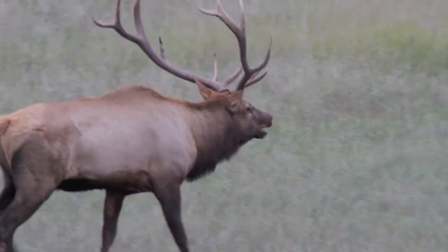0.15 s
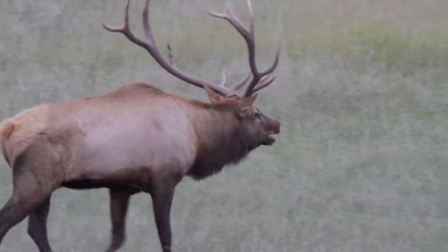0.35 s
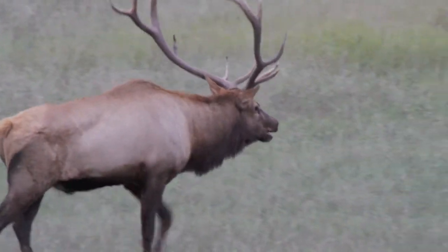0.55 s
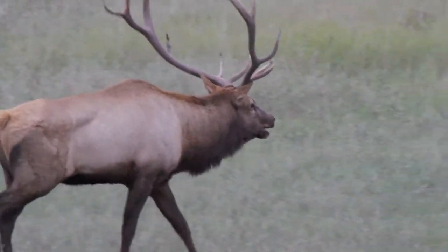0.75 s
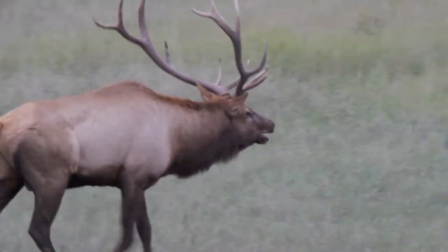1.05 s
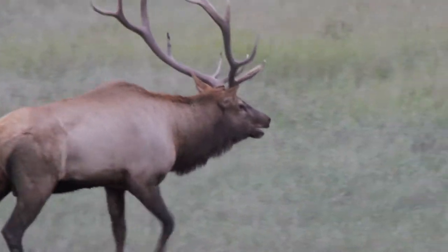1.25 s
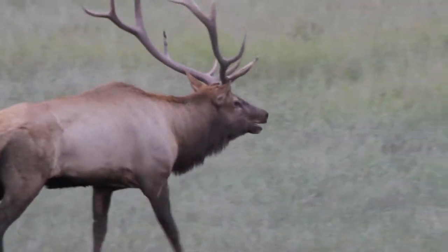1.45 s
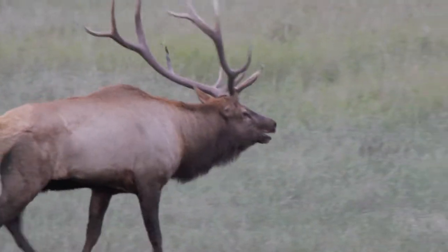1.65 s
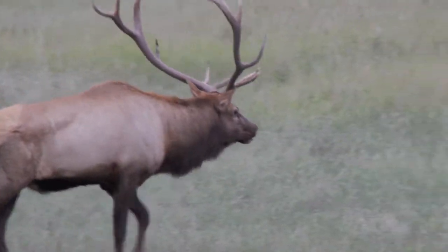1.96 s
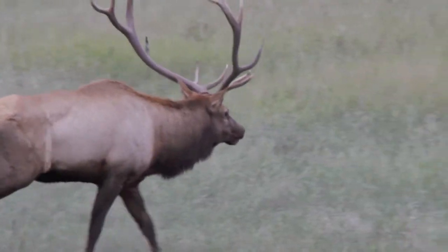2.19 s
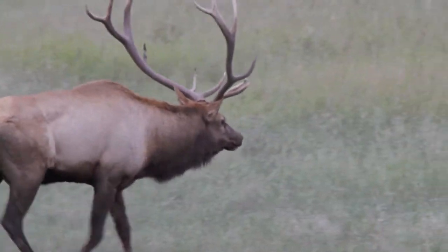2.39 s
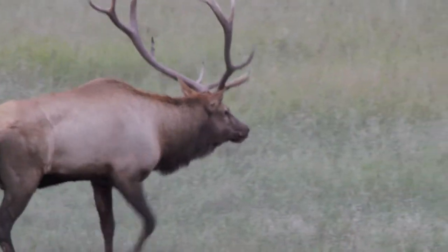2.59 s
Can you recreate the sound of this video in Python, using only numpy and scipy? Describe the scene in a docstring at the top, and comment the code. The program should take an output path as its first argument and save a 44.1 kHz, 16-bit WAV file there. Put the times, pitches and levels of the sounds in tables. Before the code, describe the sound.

Elk bugle: hoarse, breaking whistle falling to a short moan, then echo, wind and faint chirps

```python
"""A bull elk bugles in an open meadow: a high whistle jumps between registers over a hoarse roar that
all but stops after a second; the whistle then breaks, drops and ends in a short moan. The whistle is
a trembling harmonic tone; the roar is fold pulses and noisy puffs filtered by throat resonances.
Distant trees echo the call. Behind it lie faint gliding chirps and ticks of small birds or insects,
a soft bump, and shaped noise for wind rumble and steady hiss."""
import sys
import numpy as np
from scipy import signal
from scipy.fft import rfft, irfft
from scipy.io import wavfile

SR = 44100
rng = np.random.default_rng(int(sys.argv[2]) if len(sys.argv) > 2 else 0)


def waveform_to_disk(signal):
    """Save audio, clipped to [-1, 1], as 16-bit WAV at the path in sys.argv[1]."""
    frames = np.transpose(np.atleast_2d(signal))
    scaled = np.clip(frames, -1, 1) * 32767
    samples = np.round(scaled).astype(np.int16)
    wavfile.write(sys.argv[1], SR, samples)


N = 120393
T = np.arange(N) / SR  # time of each sample, s

# Vocal folds and roar. Each row: time in seconds, fold pitch in Hz, roar level in dB,
# factor on the throat's resonance frequencies.
FOLDS_AND_ROAR = [(0, 170, -37.5, 1.022), (.17, 162, -33.5, 1.05), (.27, 161.7, -33, 1.05),
                  (.43, 146.7, -31.5, 1.04), (.49, 134.8, -28.5, .94), (.54, 131.2, -29.5, 1.004),
                  (.68, 151.5, -32, 1.01), (.83, 139, -34, 0.97), (.93, 145.2, -35, 0.98),
                  (1.032, 149, -31.5, 1.04), (1.056, 145.8, -61, 0.93), (1.73, 141.1, -45, 1.05),
                  (1.79, 128.7, -42.5, 1.08), (1.85, 123.6, -66.5, .97)]
# Roughness of the voice. Each row: time in seconds, roughness from 0 to 1.
ROUGHNESS = [(.2, .33), (.5, .47), (1.0, .45), (1.7, .75)]


def amp(db):
    """Logarithmic level: decibels become an amplitude ratio."""
    return 10 ** (np.asarray(db) / 20)


def unit(x):
    """Power normalisation: the signal is scaled to rms 1."""
    return x / np.sqrt(np.mean(abs(x) ** 2) + 1e-20)


def curves(table):
    """Linear interpolation: each column of a time table is read at every sample."""
    seconds, *columns = np.transpose(table)
    return [np.interp(T, seconds, column) for column in columns]


def at_hz(table, hz):
    """Logarithmic frequency scale: a spectrum table is interpolated along log frequency."""
    table_hz, value = np.transpose(table)
    return np.interp(np.log(hz + 1), np.log(table_hz), value)


def wander(rate_hz):
    """Low-pass filtered noise: smooth random motion of rms 1, mostly below the given rate."""
    hz = np.fft.rfftfreq(N, 1 / SR)
    spectrum = rfft(rng.standard_normal(N)) / (1 + (hz / rate_hz) ** 4)
    return unit(irfft(spectrum, N))


def phase_of(hz):
    """Phase is the running integral of angular frequency."""
    return 2 * np.pi * np.cumsum(hz) / SR


def pan(db):
    """Interaural level difference: left and right gains, left louder for positive dB."""
    return amp(np.array([[db], [-db]]) / 2)


def resonate(x, hz, width):
    """Heterodyne resonance: shift the moving centre to 0 Hz, apply a double pole, shift back."""
    turn = np.exp(1j * phase_of(hz))
    r = np.exp(-np.pi * width / SR)
    smoothed = signal.lfilter([(1 - r) ** 2], [1, -2 * r, r * r], x / turn)
    return 2 * (turn * smoothed).real


def stereo_noise(gain, same):
    """Partial coherence: the right channel mixes the left one's noise with independent noise."""
    a, b = rfft(rng.standard_normal((2, N)))
    same = np.clip(same, -1, 1)
    right = same * a + np.sqrt(1 - same ** 2) * b
    return unit(irfft(np.array([a, right]) * gain, N))


def glide(start, length, from_hz, to_hz, db, waver):
    """Frequency sweep: a tone slides linearly in pitch under a half-sine swell."""
    u = np.clip((T - start) / length, 0, 1)
    hz = (from_hz + (to_hz - from_hz) * u) * (1 + waver)
    return np.sqrt(2) * amp(db) * np.sin(np.pi * u) * np.sin(phase_of(hz))


def whistle(register, folds, rough):
    """Additive synthesis with amplitude modulation: a harmonic tone trembles and the folds shake it."""
    # Each row: time in seconds, modulation depth from 0 to 1.
    shake_depth = [(0, 0.67), (.11, 0.15), (.3, 0.06), (.85, 0), (1.0, 0.05), (1.06, 0), (1.72, 0.04),
                   (1.77, 0.7)]
    jitter, shimmer, tremble_hz = 0.0026, 0.16, 63.5  # rms shares of pitch and level at rough = 1
    shake_jitter = .036  # added rms share of pitch at full depth
    break_s = .006  # fade at each end of the register

    hz, *levels = curves(register)
    depth = curves(shake_depth)[0]
    gate = np.clip(np.minimum(T - register[0][0], register[-1][0] - T) / break_s, 0, 1)
    phase = phase_of(hz * (1 + (rough * jitter + shake_jitter * depth) * wander(tremble_hz)))
    shake = 1 + depth * np.cos(folds + wander(34))
    tone = 0
    for k, db in enumerate(levels, 1):
        tremble = 1 + rough * shimmer * wander(tremble_hz)
        tone = tone + amp(db) * np.sin(k * phase) * tremble
    return np.sqrt(2) * gate * shake * tone


def fold_drive(folds, rough):
    """Glottal excitation: one uneven pulse per fold cycle, crossfaded by roughness to noisy puffs."""
    cycle = folds / (2 * np.pi)
    pulse_unevenness, puff_cycles = .2, 1  # rms share of pulse height, decay in fold cycles
    clicks = np.diff(np.floor(cycle), prepend=0)
    pulses = unit(clicks * (1 + pulse_unevenness * wander(106)))
    puffs = unit(np.exp(-(cycle % 1) / puff_cycles) * rng.standard_normal(N))
    return (1 - rough) * pulses + rough * puffs


def roar(folds):
    """Source-filter principle: fold pulses and puffs ring wobbling, fluttering throat resonances."""
    # Each row: centre in Hz before scaling, pole width in Hz, relative level in dB.
    resonances = [(557.2, 15.7, 7.5), (642, 84, -0.5), (951, 74, 0.5), (1017, 157, -3), (1372, 62, -4.5),
                  (1746, 129, 0), (2143, 160, -7.5), (2342, 116, -6)]
    # Gain of the upper resonances. Each row: time in seconds, gain in dB.
    upper_gain = [(0, -0.5), (.44, -3), (.8, -11.5), (1.05, -10.5), (1.8, 1.5)]
    # Two lowest fold harmonics. Each row: time in seconds, gain in dB relative to the roar.
    chest_gain = [(.1, -42), (.2, -13.5), (.4, -17), (.52, -30.5), (.68, -17), (.9, -21.5)]
    upper_hz, low_cut_hz = 1200, 542
    wobble, wobble_hz = 0.026, 13.5  # rms share of resonance frequency at full roughness
    flutter_db, flutter_hz = 3.2, 38  # rms level motion of each resonance

    _, db, scale = curves(FOLDS_AND_ROAR)
    rough = np.clip(curves(ROUGHNESS)[0], 0, 1)
    drive = fold_drive(folds, rough)
    bright = amp(curves(upper_gain)[0])
    ringing = 0
    for hz, width, level in resonances:
        flutter = amp(level + flutter_db * wander(flutter_hz))
        centre = hz * scale * (1 + wobble * rough * wander(wobble_hz))
        ring = flutter * resonate(drive, centre, width)
        ringing = ringing + ring * (bright if hz > upper_hz else 1)
    high_pass = signal.butter(N=6, Wn=low_cut_hz, btype="high", fs=SR, output="sos")
    ringing = signal.sosfilt(high_pass, ringing)
    chest = amp(curves(chest_gain)[0]) * (np.sin(folds) + 0.87 * np.sin(2 * folds))
    return amp(db) * (unit(ringing) + chest)


def breath():
    """Turbulent airflow: band-passed noise of the open throat, loudest early in the bugle."""
    # Each row: time in seconds, level in dB.
    breath_level = [(0, -58), (.13, -48), (.43, -50.5), (.6, -64)]
    centre_hz, width = np.full(N, 3290), 3600  # Hz; width of the poles in each of two passes
    hiss = resonate(rng.standard_normal(N), centre_hz, width)
    hiss = resonate(hiss, centre_hz, width)
    return amp(curves(breath_level)[0]) * unit(hiss)


def moan():
    """Harmonic series: the folds come back at a higher pitch under the falling whistle."""
    # Each row: time in seconds, pitch in Hz, level in dB.
    moan_course = [(1.55, 370, -46.5), (1.63, 348.8, -41.5), (1.74, 353, -36.5), (1.79, 346.2, -34),
                   (1.83, 325, -45)]
    # Relative level in dB of each harmonic, from the fundamental up.
    harmonic_levels = [-25, 4.5, 13.5, 0, -2]
    hz, db = curves(moan_course)
    phase = phase_of(hz * (1 + 0.0086 * wander(82.6)))
    gate = (T > moan_course[0][0]) & (T < moan_course[-1][0])
    tone = sum(amp(level) * np.sin(k * phase) for k, level in enumerate(harmonic_levels, 1))
    return gate * amp(db) * unit(tone)


def yelps():
    """Frequency sweeps: short side tones and yelps as the voice cracks, wavering with roughness; at the very
    start a steady tone near 1290 Hz lingers from an earlier whistle."""
    # Each row: start in seconds, length in seconds, first pitch in Hz, last pitch in Hz, level in dB.
    yelp_rows = [(-.03, 0.1, 3055, 2790, -40), (-.03, 0.13, 1286, 1297, -34), (0, 0.3, 566, 567, -37),
                 (0.454, 0.057, 718, 500, -33), (0.809, 0.094, 717, 887, -45),
                 (0.853, 0.19, 531.4, 600, -38.5), (0.961, 0.078, 1162, 992, -32.5),
                 (1.463, 0.02, 976, 881, -38), (1.762, 0.071, 733.6, 631, -38.5)]
    waver = 0.028 * curves(ROUGHNESS)[0] * wander(106)  # share of pitch
    return sum(glide(*row, waver) for row in yelp_rows)


def elk_call():
    """Common excitation: one fold phase drives the roar and shakes every whistle register."""
    # Whistle registers. Each row: time in seconds, pitch in Hz, then the level in dB of harmonic 1,
    # of harmonic 2 and, in three of the registers, of harmonic 3.
    opening = [(0, 1680, -52, -50), (.06, 1520, -36, -48), (0.087, 1320, -33, -48),
               (0.102, 1291, -27, -39.5), (0.168, 1285, -27, -37.5), (0.195, 1287, -38, -49),
               (.24, 1150, -35, -46)]
    first_break = [(0.214, 933, -28, -60, -49), (0.224, 942.6, -28, -57, -41.5),
                   (0.317, 972, -21, -59, -51), (0.333, 979.8, -31, -64, -52),
                   (0.389, 994, -28.5, -63, -60), (0.41, 929, -32, -60, -64),
                   (.425, 916.4, -24.5, -37, -48), (0.449, 921, -28, -31.5, -45),
                   (0.463, 900, -65, -72, -75)]
    rising = [(0.317, 1072, -33, -60), (0.337, 1060, -21.5, -32.5), (0.356, 1060, -23, -43),
              (0.387, 1072, -45, -39), (0.42, 1054, -25, -43), (0.45, 1061, -27.5, -41),
              (0.466, 1109, -48, -40.5), (0.505, 1152, -35.5, -36.5), (0.539, 1124, -33.5, -41),
              (0.604, 1171, -46, -34.5), (0.651, 1185, -54, -30), (0.673, 1182, -56, -41)]
    held = [(0.658, 1215, -47, -36, -74), (.68, 1219, -34.5, -43, -93), (.785, 1213, -32, -31, -64),
            (0.9, 1204, -32.5, -36.5, -58), (0.93, 1209, -25, -31, -57), (.98, 1212, -28.5, -34.5, -53.5),
            (1.048, 1211, -40.5, -28.5, -62), (1.069, 1220, -32.5, -40, -75),
            (1.167, 1209, -36.5, -31.5, -55.5), (1.281, 1198, -34, -39.5, -52.5),
            (1.327, 1202, -45, -31.5, -59), (1.353, 1204, -43, -33.5, -94), (1.372, 1186, -55, -53, -91)]
    falling = [(1.366, 1045, -40, -53, -74), (1.379, 1037, -20, -39, -47.5), (1.40, 1026, -21, -60, -53.5),
               (1.433, 1046, -20, -34.5, -54), (1.45, 1089, -32.5, -39, -70),
               (1.463, 1172, -43.5, -35.5, -67), (1.539, 1090, -35.5, -39, -62),
               (1.57, 1036, -21, -40.5, -52.5), (1.63, 1035, -23.5, -43.5, -60),
               (1.657, 1003, -26.5, -49, -58), (1.673, 941, -22.5, -52, -46), (1.70, 935, -25.5, -44, -44),
               (1.744, 939, -26, -42, -58), (1.765, 867.4, -44, -47, -49), (1.796, 815.5, -65, -51, -54)]
    # Factor on the tremble of each register, in the same order.
    register_rough = [.8, 1.1, 1.3, .4, .8]

    fold_jitter = 0.06036 * curves(ROUGHNESS)[0] * wander(62.2)  # share of pitch
    folds = phase_of(curves(FOLDS_AND_ROAR)[0] * (1 + fold_jitter))
    registers = zip((opening, first_break, rising, held, falling), register_rough)
    whistles = sum(whistle(register, folds, rough) for register, rough in registers)
    return whistles + roar(folds) + breath() + moan() + yelps()


def arrive(x):
    """Arrival-time difference: the call reaches the left first, with scatter from nearby ground."""
    left_lead_s, elk_pan_db = .000035, .5
    near_db, near_t60_s = -18, .2  # level and 60 dB decay time of the scatter
    hz = np.fft.rfftfreq(N, 1 / SR)
    late = irfft(rfft(x) * np.exp(-2j * np.pi * hz * left_lead_s), N)
    direct = np.array([x, late]) * pan(elk_pan_db)
    decay = amp(-60 * T / near_t60_s)
    scatter = unit(rng.standard_normal((2, N)) * decay) / np.sqrt(N)
    return direct + amp(near_db) * signal.fftconvolve(x[None], scatter, axes=1)[:, :N]


def tree_lines(x):
    """Discrete reflection: a few edges of the wood return delayed, weaker copies of the whole call."""
    # Each row: delay in seconds, level in dB.
    distinct_echoes = [(.18, -20), (.68, -28.5), (.98, -33.5)]
    return sum(amp(db) * np.interp(T - delay, T, x, left=0) for delay, db in distinct_echoes)


def echo(x):
    """Diffuse reverberation: convolution with noise decaying at its own rate in each band."""
    # Each row: frequency in Hz, time in seconds to decay by 60 dB.
    decay_times = [(300, 0.57), (1000, 4.1), (2400, 3.4), (5000, 0.6)]
    rise_s, likeness = 0.022, 0.91  # time constant of the build-up, left-right likeness
    hz, t, z = signal.stft(stereo_noise(1, likeness), SR, nperseg=256)
    decay = amp(-60 * t / at_hz(decay_times, hz)[:, None])
    z = z * decay * (1 - np.exp(-t / rise_s))
    tail = signal.istft(z, SR, nperseg=256)[1][:, :N]
    return signal.fftconvolve(x[None], tail / np.sqrt(SR / 6), axes=1)[:, :N]


def chirps():
    """Frequency sweeps: falling chirps, shorter higher ticks of varied pitch and one falling whistle."""
    # Middle of each chirp in seconds.
    chirp_times = [0.031, .894, .968, 1.056, 2.364, 2.438, 2.526]
    # Middle of each clearer tick in seconds.
    tick_times = [0.12, 0.206, .226, .312, 0.406, .55, 1.011, 1.175, 1.254, 1.343, 1.683, 1.752, 2.022,
                  2.11, 2.165, 2.565, 2.651]
    # One row each: length in seconds, first pitch in Hz, last pitch in Hz, level in dB.
    chirp_shape = (.034, 4380, 3960, -51.5)
    tick_shape = (.022, 5020, 4580, -52.5)
    # One row: start in seconds, length in seconds, first pitch in Hz, last pitch in Hz, level in dB.
    far_whistle = (2.04, .09, 2700, 2300, -52)
    faint_count, faint_db = 22, -5  # fainter ticks at random times, dB relative to the tick shape
    tick_spread = .03  # scale of the random pitch offset, share of pitch

    waver = 0.0061 * wander(228)
    low = sum(glide(s - chirp_shape[0] / 2, *chirp_shape, waver) for s in chirp_times)
    ticks = [(s, faint_db * rng.random() / 2) for s in tick_times]
    ticks += [(s, faint_db) for s in rng.random(faint_count) * T[-1]]
    high = 0
    for s, db in ticks:
        offset = tick_spread * rng.uniform(-1.1, 1)
        high = high + amp(db) * glide(s - tick_shape[0] / 2, *tick_shape, waver + offset)
    return low + high + glide(*far_whistle, waver)


def bump():
    """Frequency sweep: a soft, low, falling thump."""
    # One row: start in seconds, length in seconds, first pitch in Hz, last pitch in Hz, level in dB.
    bump_shape = (2.068, .026, 200, 140, -39)
    return glide(*bump_shape, 0)


def wind():
    """Modulated low-frequency noise: gusty wind on the microphone, stronger on the right."""
    # Each row: frequency in Hz, relative spectral level in dB.
    wind_spectrum = [(8, 2.5), (25, 1.5), (41, 0.5), (62, -9), (110, -21.5), (200, -34), (1000, -67)]
    # Each row: time in seconds, level in dB.
    wind_course = [(0, -30.5), (.52, -25.5), (.8, -28.5), (1.02, -23), (1.72, -23), (1.82, -28),
                   (2.2, -24.5), (2.73, -27.5)]
    gust_db, gust_hz = 1.5, 17.4  # rms level motion and its rate
    hz = np.fft.rfftfreq(N, 1 / SR)
    gusts = amp(curves(wind_course)[0] + gust_db * wander(gust_hz))
    return stereo_noise(amp(at_hz(wind_spectrum, hz)), 0.67) * gusts * pan(-3)


def air():
    """Stationary shaped noise: an even hiss whose left-right coherence varies with frequency."""
    # Each row: frequency in Hz, relative spectral level in dB.
    air_spectrum = [(88, -50), (150, -12.5), (296, -9), (650, -7.5), (1050, -10.5), (1370, -14),
                    (15500, -23.5)]
    # Each row: frequency in Hz, left-right likeness from 0 to 1.
    air_likeness = [(150, 0.61), (700, 0.78), (2000, 0.58), (4000, 0.24), (8000, 0.2), (15000, 0.43)]
    air_db = -46
    hz = np.fft.rfftfreq(N, 1 / SR)
    return amp(air_db) * stereo_noise(amp(at_hz(air_spectrum, hz)), at_hz(air_likeness, hz))


def scene():
    """Superposition: the elk, its echoes, the chirps, the bump and the meadow's noise add up."""
    elk = elk_call()
    far = chirps()
    call = arrive(elk) + tree_lines(elk)
    echoes = echo(amp(-18) * elk + amp(-5) * far)
    return call + echoes + far * pan(3.3) + bump() + wind() + air()


def record(dry):
    """Band limitation: a steep linear-phase low-pass removes the top of the treble."""
    edge_hz = 15720
    low_pass = signal.firwin(801, edge_hz, window=("kaiser", 9), fs=SR)
    return signal.oaconvolve(dry, low_pass[None], "same")


dry = scene()
out = record(dry)
waveform_to_disk(out)
```